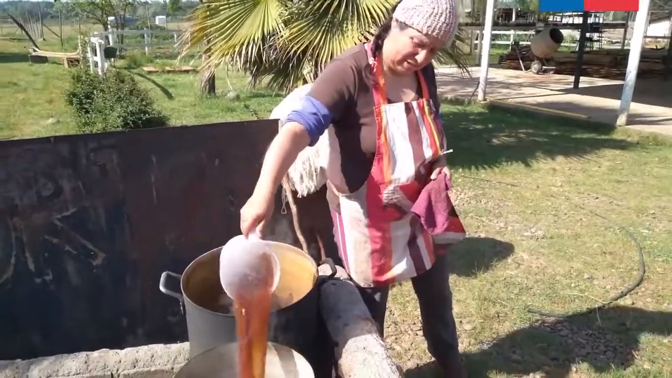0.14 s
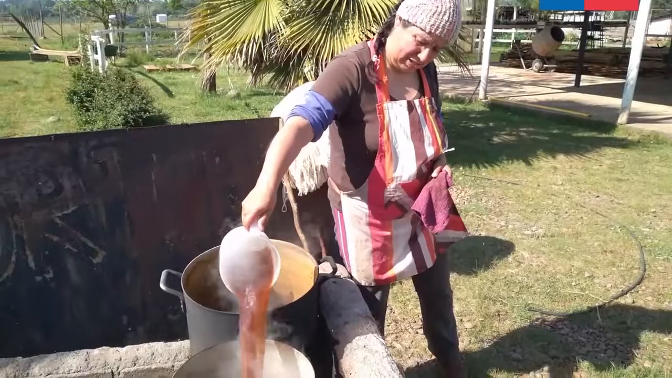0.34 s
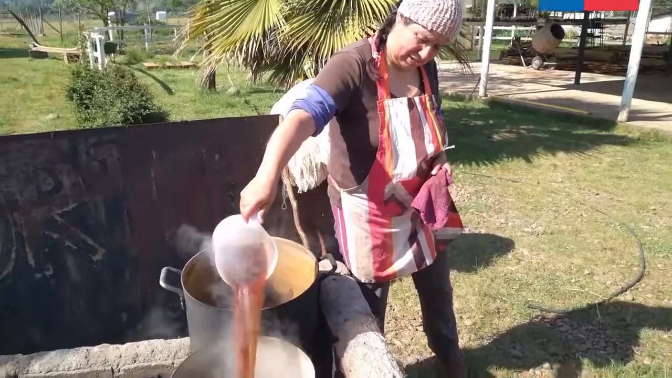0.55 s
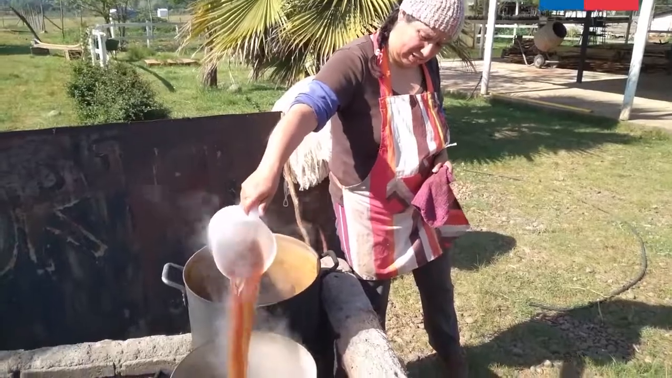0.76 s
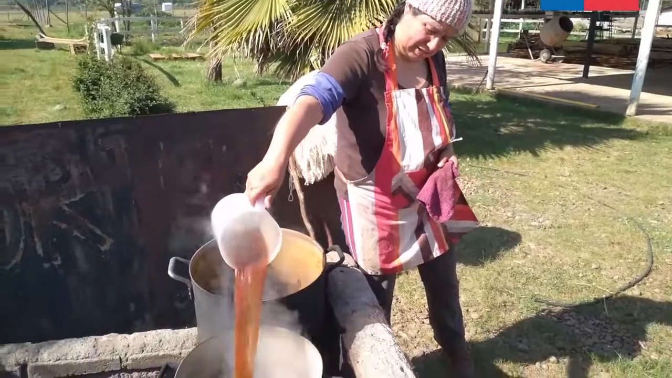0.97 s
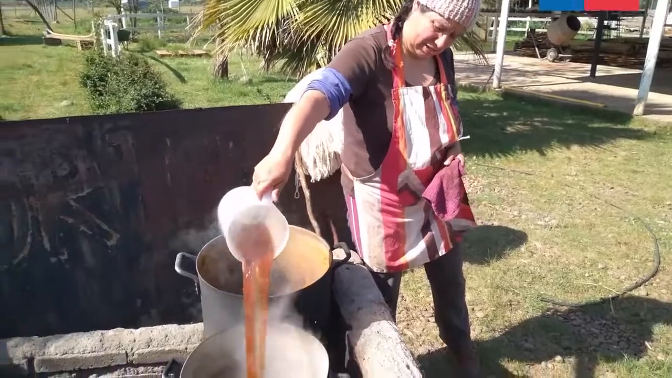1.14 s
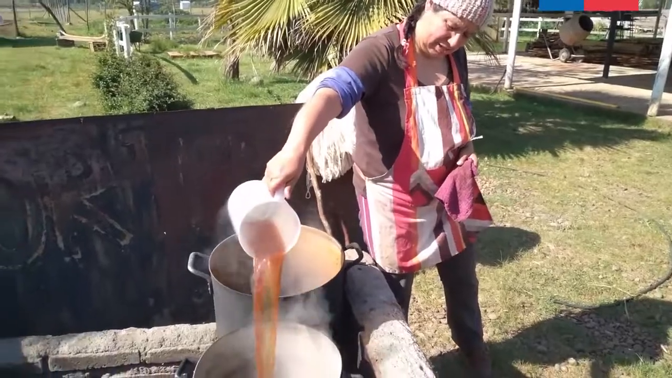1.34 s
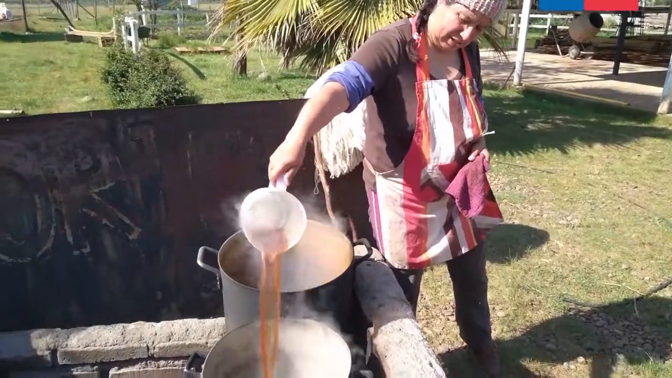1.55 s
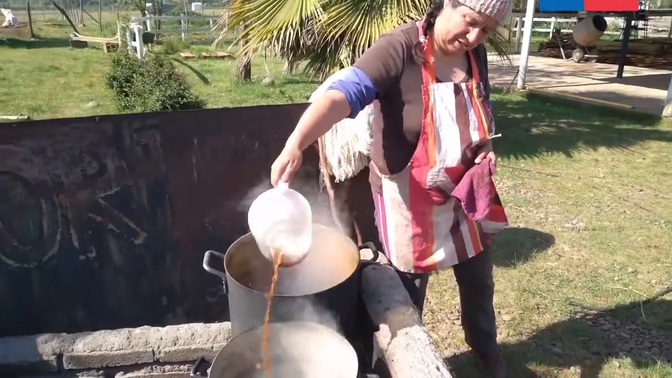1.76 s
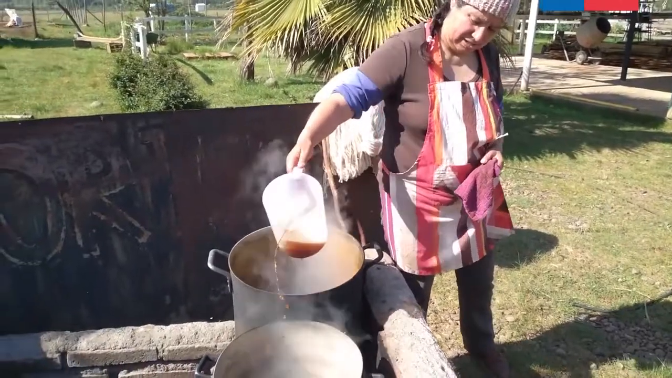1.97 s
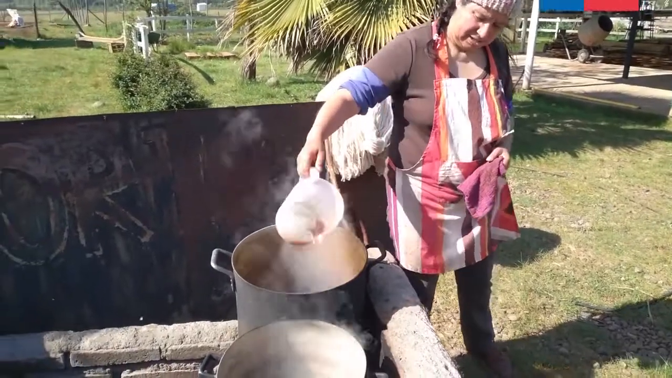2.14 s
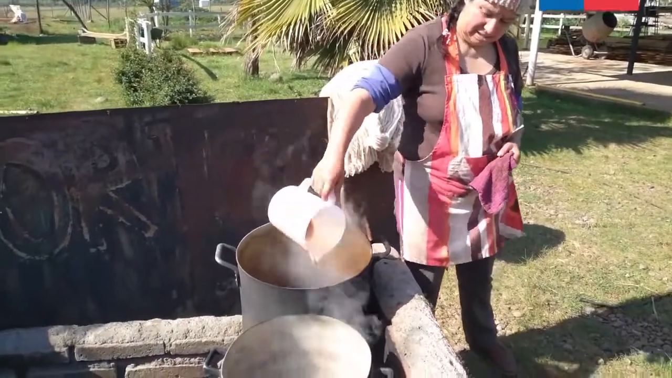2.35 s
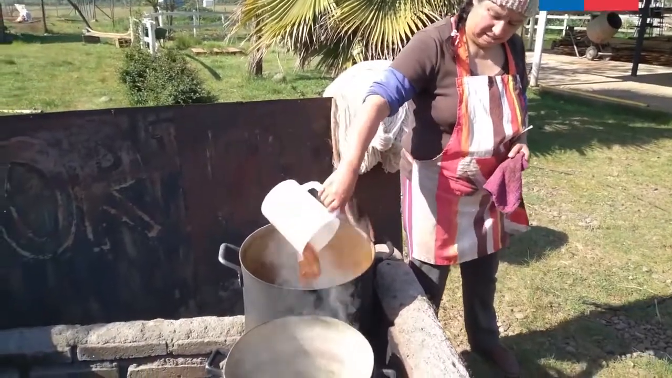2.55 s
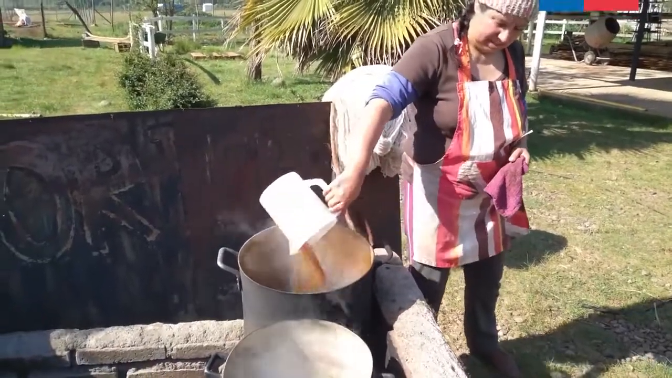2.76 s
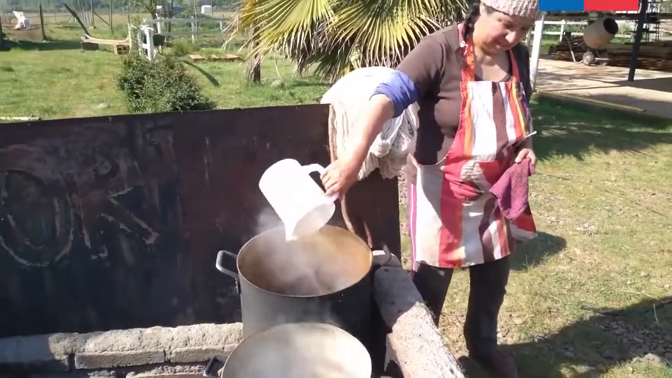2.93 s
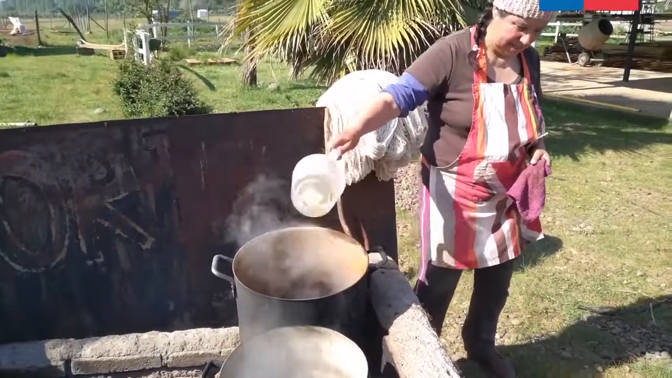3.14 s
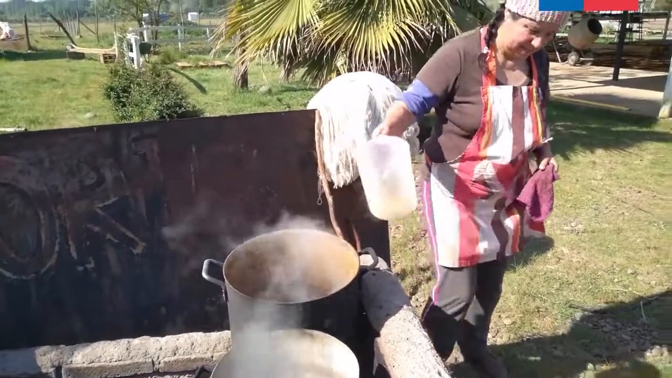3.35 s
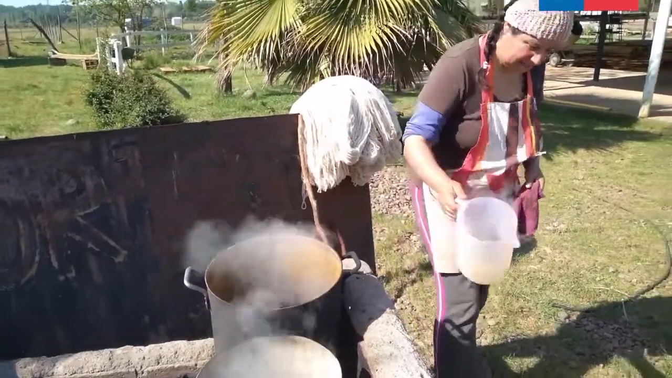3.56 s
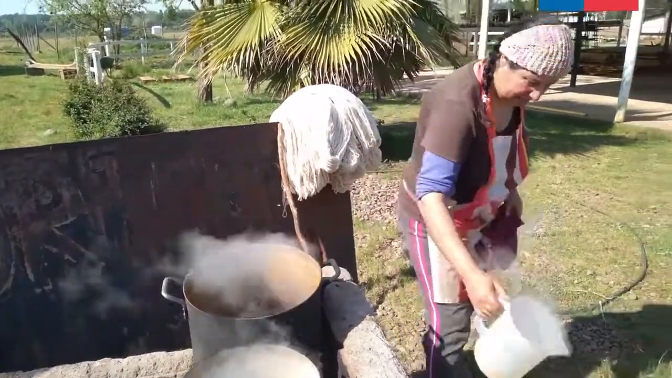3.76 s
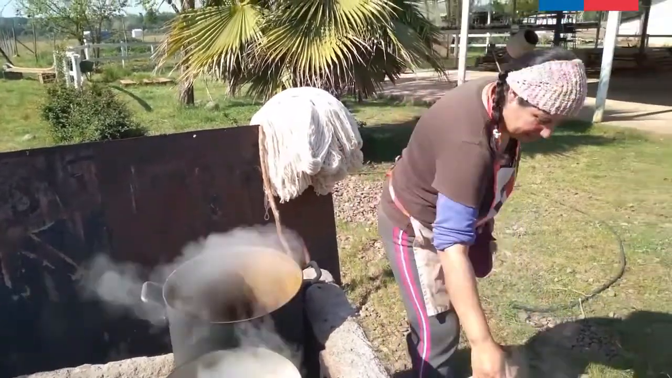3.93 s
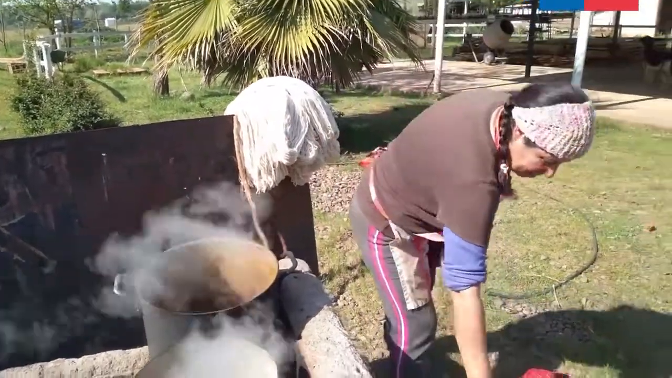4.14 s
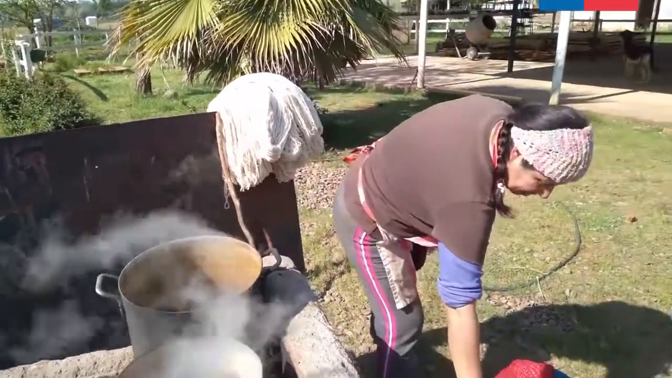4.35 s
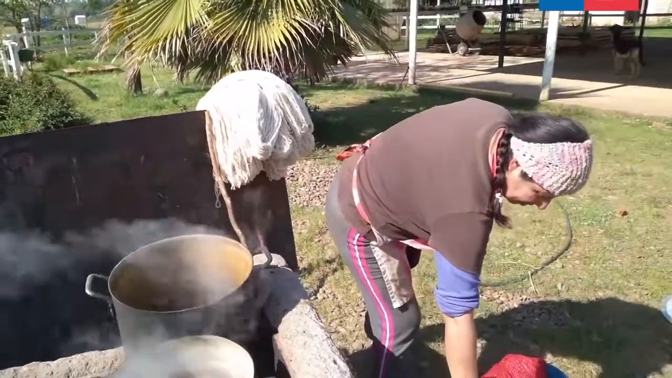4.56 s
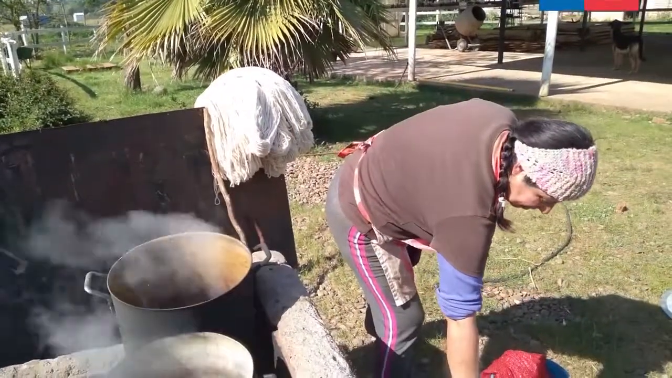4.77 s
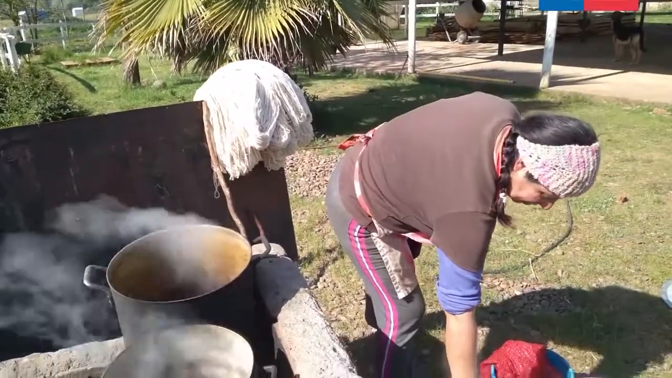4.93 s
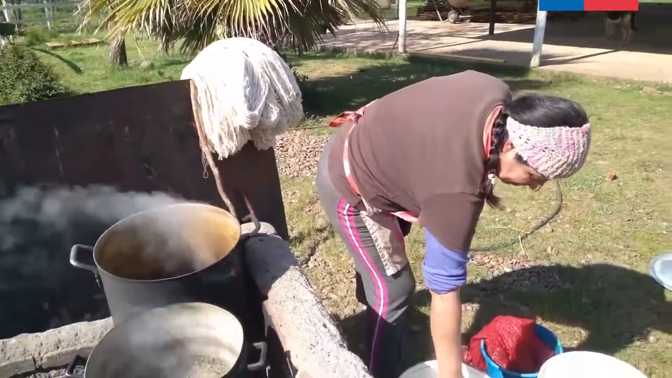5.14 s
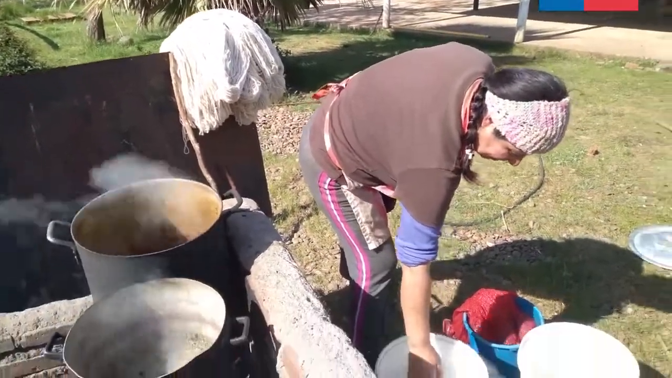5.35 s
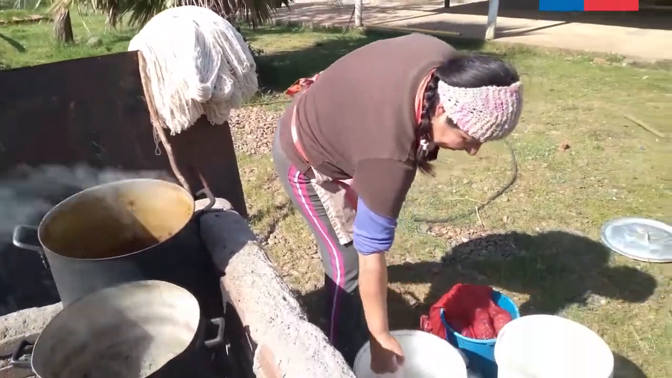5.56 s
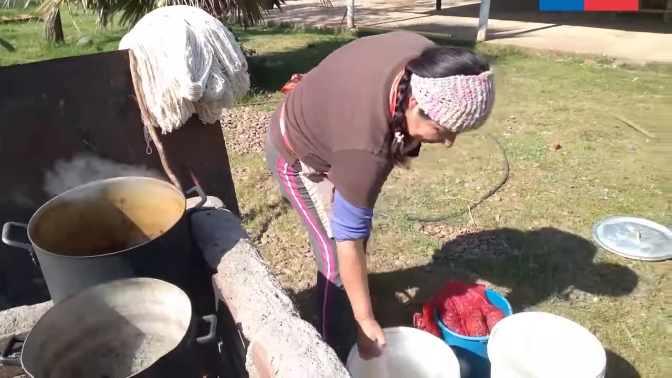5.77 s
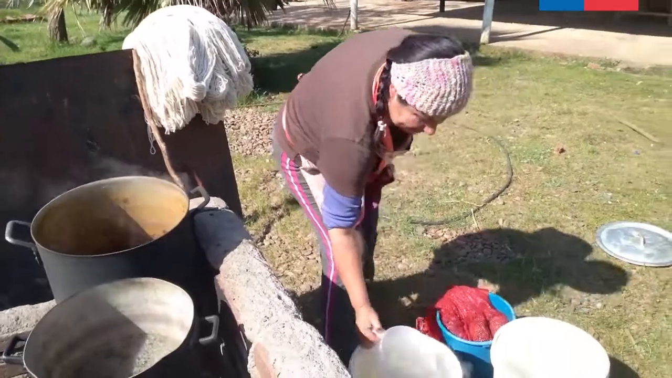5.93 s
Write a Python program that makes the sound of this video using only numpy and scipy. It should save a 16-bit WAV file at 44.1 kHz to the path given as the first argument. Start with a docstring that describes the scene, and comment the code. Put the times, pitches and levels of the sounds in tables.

```python
"""A long splashing pour and then thrown dregs are heard in a big metal pot, amid wind thumps and a motor hum.
The pour layers ringing bubbles, impact noise and spray, shaped by the pot as the stream lands deeper.
The plastic jug is then knocked, dragged and dipped in a bucket: noise bursts, decaying modes and stick-slip clicks.
Wind is low noise with single slow pulses; the motor is a wavering sine over a faint hiss of open air."""
import sys
import numpy as np
from scipy import signal
from scipy.io import wavfile
from scipy.ndimage import uniform_filter1d, map_coordinates

SR = 44100
rng = np.random.default_rng(int(sys.argv[2]) if len(sys.argv) > 2 else 0)


def waveform_to_disk(signal):
    """Save audio, clipped to [-1, 1], as 16-bit WAV at the path in sys.argv[1]."""
    frames = np.transpose(np.atleast_2d(signal))
    scaled = np.clip(frames, -1, 1) * 32767
    samples = np.round(scaled).astype(np.int16)
    wavfile.write(sys.argv[1], SR, samples)


N = 264600
TIME = np.arange(N) / SR

# the long pour and the dregs, before the trims of each layer:
# (time [s], gurgle level [dB], splash level [dB], spray level [dB])
POUR_CURVES = [
    [(0.0, -22, -33, -28), (0.012, -20.5, -31, -20), (0.024, -23, -30.5, -24), (0.055, -28, -20.5, -25.5),
     (0.078, -22, -28, -32), (0.094, -21, -27, -15), (0.106, -27, -32, -44), (0.122, -29, -31, -41),
     (0.135, -20.5, -23.5, -29), (0.162, -21, -24, -25.5), (0.18, -31, -30, -29),
     (0.205, -29.5, -23, -25.5), (0.255, -22, -26.5, -20.5), (0.272, -32, -25, -28.5),
     (0.3, -26, -24.5, -25), (0.41, -28.5, -23, -30), (0.44, -31.5, -31, -30), (0.6, -33.5, -34.5, -45),
     (0.73, -30, -30.5, -32), (0.86, -33.5, -39.5, -36), (0.925, -34.5, -37, -45), (0.97, -34.5, -39, -41),
     (1.04, -33.5, -43, -54), (1.13, -33.5, -46, -71), (1.2, -33, -43, -30.5), (1.29, -32.5, -37.5, -39),
     (1.4, -36.5, -44, -37), (1.51, -37, -37.5, -36.5), (1.66, -36.5, -37, -33.5),
     (1.8, -31.5, -34.5, -28.5), (1.91, -30, -31.5, -29), (1.97, -37.5, -40.5, -45),
     (2.13, -44.5, -50, -51), (2.27, -51.5, -70, -57), (2.3, -59, -74, -77)],
    [(2.7, -73, -78, -99), (2.718, -53, -87, -31), (2.772, -80, -44.5, -46), (2.793, -53, -37, -37),
     (2.804, -35, -22, -24), (2.826, -29.5, -28.5, -29), (2.84, -30, -31, -29), (2.876, -24, -23.5, -33),
     (2.9, -33, -27.5, -31), (2.938, -31, -26, -27), (2.968, -41, -26, -28), (2.992, -28, -31.5, -28.5),
     (3.012, -31, -32, -36), (3.034, -33, -27.5, -30), (3.068, -38, -37, -35.5), (3.085, -43, -38, -50),
     (3.11, -46, -50.5, -40), (3.17, -58, -60, -63)],
]
# colour of splashing near the surface: (frequency [Hz], density [dB per Hz])
SPLASH_COLOUR = [(710, -10), (1200, -15), (1450, -10.5), (1710, 0.5), (1920, -5), (2320, -2.5),
                 (2690, -3.5), (3720, -2), (4200, -6.5), (4900, -4), (6000, -5.5), (7800, -18),
                 (13200, -120)]
# colour of splashing deep in the pot: (frequency [Hz], density [dB per Hz])
DEEP_SPLASH_COLOUR = [(710, -47.5), (1200, -31.5), (1320, -14.5), (1460, 4.5), (1730, -3.5), (2020, 1.5),
                      (2210, -3), (2600, -6.5), (3270, -8), (3900, -7.5), (4280, -7.5), (4650, -1.5),
                      (5070, -3), (5610, -25), (6000, -32), (7800, -37), (13200, -120)]
# colour of spray and of the bright ticks on knocks: (frequency [Hz], density [dB per Hz])
SPRAY_COLOUR = [(3120, -24.5), (5300, -19), (5840, -12.5), (8410, 4.5), (8980, 5), (10500, -5.5),
                (15100, -9), (16000, -46)]
POURING, HANDLING = (0, 3.2), (3.1, 6)  # when bubbles form: (from [s], to [s])


def gain_of(db):
    """Decibels to amplitude."""
    return 10 ** (np.asarray(db) / 20)


def evened(x):
    """Scales to rms 1."""
    return x / np.sqrt(np.mean(x ** 2) + 1e-20)


def peaked(x, db):
    """Scales to a peak level."""
    return gain_of(db) * x / (abs(x).max() + 1e-12)


def steadied(x, size=2600):
    """Holds the slow level near rms 1 and keeps the fast grain."""
    power = uniform_filter1d(uniform_filter1d(x ** 2, size), size)
    floor = np.mean(x ** 2) / 1000  # keeps silence from being blown up
    return x / np.sqrt(abs(power) + floor)


def add(mix, s, sound):
    """Mixes a sound in at time s, or at the start if s is negative."""
    part = mix[max(round(s * SR), 0):][:len(sound)]
    part += sound[:len(part)]


def level(tables, axis):
    """Gain over time from one dB column of several curves; silent between them."""
    gain = np.zeros(N)
    for rows in map(np.array, tables):
        gain += gain_of(np.interp(TIME, rows[:, 0], rows[:, axis], left=-140, right=-140))
    return uniform_filter1d(gain, size=200)


def swells(rows, axis, rise_s, fall_s):
    """Gain over time of strokes that each swell to a height and fade, summed as power."""
    power = np.zeros(N)
    for row in rows:
        away = TIME - row[0]
        power += (gain_of(row[axis]) * np.exp(np.minimum(away / rise_s, -away / fall_s))) ** 2
    return np.sqrt(power)


def read(points, hz):
    """Reads a spectrum table on a log-frequency axis."""
    f, value = np.transpose(points)
    return np.interp(np.log(hz + 1), np.log(f + 1), value)


def colour(x, points, size=4096):
    """Causal minimum-phase filter with the given spectrum."""
    db = np.maximum(read(points, abs(np.fft.fftfreq(size, 1 / SR))), -100)
    spectrum = np.exp(np.conj(signal.hilbert(np.log(gain_of(db)))))
    taps = np.fft.ifft(spectrum).real
    return signal.fftconvolve(x, taps[:size // 2])[:len(x)]


def band(x, low_hz, high_hz, order=3):
    """Band-pass, with its lower edge held to at most a quarter of the sample rate."""
    low_hz = np.clip(low_hz, 20, SR / 4)
    high_hz = np.clip(high_hz, low_hz + 20, SR / 2 - 20)
    return signal.sosfilt(signal.butter(order, [low_hz, high_hz], "band", fs=SR, output="sos"), x)


def resonate(x, hz, width):
    """A resonance of gain 1 that follows the curve hz: shift it to zero, smooth, shift back."""
    turn = np.exp(2j * np.pi * np.cumsum(hz) / SR)
    r = np.exp(-np.pi * width / SR)
    return 2 * (turn * signal.lfilter([(1 - r) ** 2], [1, -2 * r, r * r], x / turn + 1e-18)).real


def clicks(per_s, spread_db):
    """Random impacts, most small and a few large."""
    chance, size, sign = rng.random(N), rng.exponential(1, N), rng.choice([-1, 1], N)
    return (chance < per_s / SR) * sign * gain_of(spread_db * np.minimum(size, 4))


def burst(t, decay, rise):
    """A puff of noise that swells quickly and dies away."""
    return rng.standard_normal(len(t)) * np.exp(-t / decay) * (1 - np.exp(-t / rise)) ** 2


def bubbles(span, low_hz, high_hz, per_s, cycles, rise, spread_db):
    """Bubbles of many sizes; each rings for some cycles and rises in pitch as it nears the surface."""
    births = clicks(per_s, spread_db)
    pitch = low_hz * (high_hz / low_hz) ** rng.random(N)
    out = np.zeros(N)
    for i in np.flatnonzero(births * (TIME > span[0]) * (TIME < span[1])):
        turns = TIME[:int(5 * cycles / pitch[i] * SR)] * pitch[i]
        swell = np.exp(-turns / cycles) * (1 - np.exp(-turns))
        ring = np.sin(2 * np.pi * turns * (1 + rise * turns / cycles)) * swell
        add(out, TIME[i], births[i] * pitch[i] * ring)
    return evened(out) * np.sqrt((span[1] - span[0]) / TIME[-1])  # about rms 1 inside the span


def echoed(x, wet_db):
    """Reflections from the pot wall and the iron windbreak, each band dying at its own speed."""
    # how long reflections last: (frequency [Hz], time to fall 60 dB [s])
    echo_times = [(200, 0.28), (500, 0.37), (1500, 0.19), (3000, 0.24), (8000, 0.28), (16000, 0.33)]
    n = SR // 2
    taps = rng.choice([-1., 1.], n) * (rng.random(n) < 3000 / SR) * (np.arange(n) > SR * .002)
    hz, t, z = signal.stft(taps, SR, nperseg=256)
    fade = gain_of(-60 * t / read(echo_times, hz)[:, None])
    tail = signal.istft(z * fade, SR, nperseg=256)[1]
    return x + gain_of(wet_db) * signal.fftconvolve(x, tail / np.linalg.norm(tail))[:N]


def background():
    """A wavering motor hum and a steady whine over the faint hiss of open air."""
    # loudness of the distant motor: (time [s], level [dB])
    motor_curve = [(0, -40), (2.7, -40), (3.1, -32.5), (4.5, -30), (5.5, -34), (6, -25)]
    # colour of the open air: (frequency [Hz], density [dB per Hz])
    air_colour = [(88, -9.5), (150, -10), (190, -10), (240, -51), (291, -26), (383, -60.5), (448, -20.5),
                  (649, -32), (1170, -25), (2140, -33), (3160, -27.5), (5680, -32.5), (8560, -26),
                  (15100, -43), (16000, -55)]
    motor_hz, whine_hz, whine_db, air_db = 81.6, 183, -52.5, -55.5
    s, db = np.transpose(motor_curve)
    waver = evened(np.interp(TIME, np.linspace(0, TIME[-1], 60), rng.standard_normal(60)))
    turns = np.cumsum(motor_hz * (1 + 0.0075 * waver)) / SR
    hum = evened(np.sin(2 * np.pi * turns)) * gain_of(np.interp(TIME, s, db) + 0.29 * waver)
    whine = gain_of(whine_db) * evened(np.sin(2 * np.pi * whine_hz * TIME))
    air = gain_of(air_db) * evened(colour(rng.standard_normal(N), air_colour))
    return hum + whine + air


def wind():
    """A lumpy low rumble, and single eddies that briefly push and pull the microphone's diaphragm."""
    # low wind between the eddies, raised 9 dB below: (time [s], level [dB])
    rumble_curve = [(0, -28.5), (.2, -49.5), (.6, -43.5), (.75, -35.5), (1.9, -41.5), (2.05, -50.5),
                    (2.27, -57.5), (2.4, -34), (2.55, -49), (2.85, -39), (3.45, -46), (4.2, -45),
                    (5.25, -44), (5.82, -30), (6, -47.5)]
    # colour of the rumble: (frequency [Hz], density [dB per Hz])
    rumble_colour = [(20, -5), (38, -24), (60, 3.5), (100, -1), (150, -6.5), (220, -22.5), (400, -34),
                     (800, -57.5)]
    # strong eddies, raised 2 dB below: (time [s], level [dB], length scale [cycles])
    gusts = [(0.311, -13.5, 0.32), (0.683, -13, 0.43), (0.777, -9.5, 0.34), (0.889, -10, 0.44),
             (0.927, -14, 0.37), (0.98, -10.5, 0.44), (1.09, -6.5, 0.26), (1.142, -16.5, 0.29),
             (1.546, -5.5, 0.25), (1.573, -13, 0.49), (2.42, -15.5, 0.42), (2.624, -17, 0.26),
             (2.667, -17, 0.22), (2.81, -12, 0.16), (2.917, -6, 0.39), (4.113, -15, 0.37),
             (4.149, -10, 0.28), (4.33, -7.5, 0.34), (4.792, -10, 0.34), (4.819, -20, 0.6),
             (5.184, -4.5, 0.32), (5.496, -14, 0.57), (5.735, -12.5, 0.46), (5.801, -14, 1),
             (5.843, -12.5, 1)]
    lumps_db = 1.5  # how much the rumble comes and goes
    eddy_hz, eddy_hz_per_db = 143.6, 3.5  # pitch of a gust listed at 0 dB; weaker ones are slower
    lumps = gain_of(lumps_db * evened(uniform_filter1d(rng.standard_normal(N), size=2000)))
    rumble = steadied(lumps * colour(rng.standard_normal(N), rumble_colour), size=5000)
    out = gain_of(9.0) * level([rumble_curve], axis=1) * rumble
    t = np.arange(-SR // 32, SR // 32) / SR
    for s, db, cycles in gusts:
        hz = eddy_hz + eddy_hz_per_db * db
        swell = 1 / np.cosh(t * hz / cycles) * signal.windows.tukey(len(t), .5)
        push = np.cos(2 * np.pi * hz * t + 0.55 * rng.standard_normal())
        add(out, s + t[0], -gain_of(db + 2.0) * swell * push)
    return band(out, low_hz=28.93, high_hz=1990, order=2)


def whistles():
    """Weak, breathy tones of narrow noise that fade in, flutter and fade out."""
    # broken whistles and far tones: (start [s], length [s], level [dB], frequency [Hz], width [Hz])
    whistle_tones = [(2.282, 0.054, -61, 2020, 129), (2.325, 0.043, -58, 1850, 150),
                     (2.719, 0.041, -54, 2040, 90), (2.72, 0.079, -56, 990, 90),
                     (3.07, 0.12, -53, 2350, 120), (3.137, 0.077, -53, 930, 90),
                     (3.189, 0.041, -52.5, 3210, 130), (3.227, .36, -55, 2513, 60),
                     (3.305, 0.1, -54, 4330, 500), (3.42, 0.066, -67, 3650, 300),
                     (3.479, 0.13, -60, 4380, 424), (3.578, .16, -57, 2450, 70),
                     (3.634, 0.027, -58, 1500, 201), (3.894, .09, -61, 2005, 70),
                     (4.415, 0.07, -50.5, 500, 111), (4.52, 0.3, -53.5, 494, 78),
                     (4.555, 0.27, -61.5, 970, 160), (4.96, 0.062, -59, 1210, 70),
                     (5.184, 0.06, -50, 1137, 100), (5.294, 0.034, -57, 2530, 140),
                     (5.575, 0.08, -62, 5230, 200)]
    edge_s, flutter_db = 0.0062, -2  # soft ends, and how much each one breaks up
    out = np.zeros(N)
    for s, length, db, hz, width in whistle_tones:
        t = TIME[:int(length * SR)]
        tone = band(rng.standard_normal(SR), hz - width / 2, hz + width / 2, order=2)[-len(t):]
        flutter = gain_of(flutter_db * evened(uniform_filter1d(rng.standard_normal(SR), size=500)))[:len(t)]
        edges = np.minimum(np.minimum(t, length - t) / edge_s, 1)
        add(out, s, gain_of(db) * evened(tone * flutter * edges))
    return echoed(out, wet_db=-6)


def simmer():
    """A faint, dense patter of small bubbles in the hot liquid as the pouring ends and after."""
    seethe = bubbles(HANDLING, 422, 1900, per_s=320, cycles=17, rise=0.0031, spread_db=3.5)
    return gain_of(-68.5) * echoed(seethe, wet_db=-22)


def in_bucket(x):
    """What happens down in the bucket lingers in its resonances."""
    # resonances of the bucket: (frequency [Hz], width [Hz], level [dB])
    bucket_modes = [(483, 74, -5.5), (1023, 59, 11), (1390, 96, 13), (2595, 120, 3.5), (3200, 46, -10),
                    (3900, 160, -16), (5260, 180, 5), (5650, 260, 5), (6790, 140, 15)]
    at_bucket_s = 4  # only later sound excites the bucket
    inside = echoed(x * (TIME > at_bucket_s), wet_db=-6.5)
    ring = sum(gain_of(db) * band(inside, hz - width / 2, hz + width / 2, order=1)
               for hz, width, db in bucket_modes)
    return x + gain_of(-7.0) * ring


def pings():
    """Drips and clinks: short, slightly unsteady tones cut from narrow noise."""
    # drips and clinks: (time [s], peak level [dB], frequency [Hz], decay time [s])
    ping_tones = [(2.49, -43.5, 657, 0.0093), (2.72, -48, 3480, 0.0096), (2.754, -51, 3520, 0.016),
                  (2.758, -42, 3080, 0.02), (3.278, -6.5, 8270, 0.0018), (3.312, -41, 3190, 0.016),
                  (3.382, -43.5, 1344, 0.032), (3.452, -44, 3610, 0.01), (3.65, -42, 2517, 0.014),
                  (4.087, -26.5, 458.6, 0.017), (4.428, -47.5, 2400, 0.0064), (4.428, -50, 1790, 0.014),
                  (4.452, -45, 1820, 0.016), (5.019, -43, 5630, .04), (5.045, -42.5, 3810, .035),
                  (5.049, -24.5, 8060, 0.0044), (5.551, -44.5, 1383, 0.025), (5.571, -44, 976, 0.025),
                  (5.571, -51, 2610, 0.01), (5.572, -50, 1995, 0.008), (5.703, -53, 2740, 0.03),
                  (5.7, -47, 5540, .025), (5.698, -33.5, 8550, 0.033), (5.76, -33, 8460, 0.02),
                  (5.762, -41.5, 1043, 0.057)]
    out, t = np.zeros(N), np.arange(SR // 2) / SR
    for s, db, hz, decay in ping_tones:
        width = 14 + 0.016 * hz  # [Hz]; higher tones are fuzzier
        tone = evened(band(rng.standard_normal(SR), hz - width / 2, hz + width / 2, order=2))[-len(t):]
        add(out, s, peaked(tone * np.exp(-t / decay) * (1 - np.exp(-t / 0.000844)), db))
    return echoed(out, wet_db=-6)


def blows():
    """The jug hits the basin and chatters against it; decaying modes of both ring briefly."""
    # hard blows as the jug is put down: (time [s], peak level [dB], share of the basin in the ring [0-1])
    hits = [(4.082, -19, 0.13), (4.106, -35, 0), (4.123, -38, 0.1), (4.138, -34, 0.15), (4.157, -42, 0.1),
            (4.327, -25.5, 1), (4.353, -38, 0.64), (4.375, -41, 0.84)]
    # ring of the empty jug: (frequency [Hz], level [dB], time to fall 60 dB [s])
    jug_modes = [(427, -13, 0.093), (685, -16, 0.38), (1230, -1, 0.081), (1615, 1.5, 0.091),
                 (2390, 0, 0.061), (2710, -8, 0.13), (3400, -3, 0.063), (3680, -22, 0.2)]
    # ring of the basin: (frequency [Hz], level [dB], time to fall 60 dB [s])
    basin_modes = [(608, -1, .16), (1072, 5.5, 0.12), (1760, 6.5, 0.056), (2050, -6, 0.11),
                   (2590, -16, 0.13), (3000, -13, 0.21), (3460, -5.5, 0.11), (3740, -19, 0.22)]
    spread_db, detune_share = 3, 0.004  # each contact lands on another spot
    out, t = np.zeros(N), TIME[:SR // 3]
    for s, peak_db, basin in hits:
        ring = np.zeros(len(t))
        for modes, share in [(jug_modes, 1 - basin), (basin_modes, basin)]:
            spots = rng.standard_normal((len(modes), 2))
            for (hz, db, t60), (spot, detune) in zip(modes, spots):
                decay = np.exp(-np.log(1000) * t / t60) * np.sign(spot)
                tone = np.sin(2 * np.pi * hz * (1 + detune_share * detune) * t)
                ring += share * gain_of(db + spread_db * spot) * decay * tone
        add(out, s, peaked(ring, peak_db))
    return echoed(out, wet_db=-9)


def knocks():
    """Dull blows of banded noise with a bright tick on top and a short buzzing aftersound."""
    # knocks of the jug and hollow slaps of liquid, scaled together below:
    # (time [s], level [dB], lowest frequency [Hz], highest frequency [Hz], bright tick level [dB])
    knock_list = [(0.066, -12, 1050, 1990, -40), (0.0866, -14.5, 1120, 1760, -45),
                  (0.207, -14.5, 1430, 1870, -45), (0.2425, -15.5, 1820, 2640, -45),
                  (0.282, -16, 1150, 1680, -45), (0.332, -9, 1300, 1970, -45),
                  (0.589, -12, 1260, 2270, -45), (0.633, -12, 1450, 3740, -50),
                  (0.681, -20.5, 1350, 2430, -50), (0.893, -21.5, 1480, 2270, -50),
                  (1.0926, -28.5, 1440, 2200, -65), (1.161, -27, 1370, 3930, -45),
                  (1.29, -26, 1450, 2099, -55), (1.437, -20.5, 3500, 4300, -45),
                  (1.488, -30, 3770, 4050, -50), (1.503, -30, 3760, 4200, -45),
                  (2.526, -12, 1540, 3450, -19), (2.778, -15.5, 1280, 2260, -40),
                  (2.804, -9, 1900, 2680, -26), (2.821, -8, 930, 2430, -11),
                  (2.906, -13.5, 1810, 2280, -36), (2.922, -23, 920, 1600, -40),
                  (3.031, -24, 920, 1350, -51), (3.183, -25.5, 296, 1430, -44),
                  (3.205, -32, 450, 1390, -58), (3.335, -33, 520, 1100, -60), (3.278, -17, 600, 1170, -28),
                  (4.081, -16, 890, 3470, -25), (4.082, -26, 5000, 7700, -43),
                  (4.083, -18.5, 218, 495, -58), (4.108, -27.5, 250, 1300, -54),
                  (4.135, -28.5, 900, 2680, -48), (4.324, -23.5, 2560, 3640, -17.5),
                  (4.325, -27, 5530, 13500, -42), (4.329, -23, 230, 600, -54),
                  (4.361, -45, 2380, 3740, -52), (4.518, -43, 940, 1130, -71),
                  (4.997, -38, 1540, 1900, -70), (5.042, -23.5, 1230, 1750, -31),
                  (5.042, -23, 4400, 6150, -50), (5.074, -28, 1370, 1820, -55),
                  (5.072, -32, 4200, 7000, -40), (5.088, -21.5, 2710, 3120, -55),
                  (5.117, -27.5, 1290, 1800, -51), (5.142, -32, 1380, 1710, -58),
                  (5.243, -24.5, 1480, 1940, -51), (5.255, -30.5, 2450, 2665, -62),
                  (5.269, -27, 1610, 2030, -59), (5.273, -41, 2360, 2650, -62),
                  (5.34, -44, 1900, 2800, -65), (5.308, -38.5, 5300, 6300, -50),
                  (5.399, -57, 1980, 5000, -29.5), (5.474, -33, 840, 1530, -58),
                  (5.465, -25.5, 172, 327, -69), (5.572, -22, 278, 550, -60), (5.63, -29, 3640, 4540, -52),
                  (5.682, -39.5, 850, 1070, -50), (5.696, -32, 2600, 3120, -40),
                  (5.763, -35, 277, 800, -46), (5.824, -23.5, 300, 690, -60),
                  (5.789, -20.5, 1870, 2610, -25.5), (5.798, -35, 330, 750, -60),
                  (5.858, -26, 350, 900, -60), (5.823, -20.5, 1900, 3180, -18.5),
                  (5.872, -18, 850, 2160, -49), (5.89, -25, 400, 1390, -52),
                  (5.903, -19.5, 2290, 5800, -20), (5.964, -39, 6550, 7440, -17.5),
                  (5.99, -30, 3850, 4150, -32)]
    decay_s, tail_share, tail_s = 0.0055, 0.17, 0.026  # the vessel goes on buzzing after a blow
    out, t = np.zeros(N), np.arange(SR // 4) / SR
    for s, db, low_hz, high_hz, tick_db in knock_list:
        thump = burst(t, decay_s, rise=0.001) + tail_share * burst(t, tail_s, rise=0.003)
        blow = band(thump, low_hz, high_hz, order=4)
        tick = colour(burst(t, decay_s * 0.87, rise=0.0011), SPRAY_COLOUR)
        add(out, s - .001, peaked(blow, db) + peaked(tick, tick_db))
    return in_bucket(echoed(0.63 * out, wet_db=-8))


def rubs():
    """Liquid slops in the carried jug; the jug stutters along the bucket and dips in."""
    # strokes of carrying, dragging and dipping: (time of the height [s], hollow body level [dB], rasp level [dB])
    rub_strokes = [
        [(3.2, -34, -39.5), (3.29, -46, -37), (3.36, -56, -41), (2.9, -36.5, -54), (3.43, -41.5, -43.5),
         (3.6, -38, -39.5), (3.72, -35, -63), (4.2, -40, -42)],
        [(4.99, -65, -62), (5.06, -30, -39.5), (5.125, -22.5, -29.5), (5.21, -27, -41), (5.27, -39, -39),
         (5.33, -57, -50)],
        [(5.49, -71, -69), (5.56, -36.5, -60), (5.69, -58, -54), (5.8, -29, -44), (5.89, -41, -28.5),
         (5.97, -37, -42)],
    ]
    # how a stroke of each kind swells and fades: (rise time [s], fall time [s])
    stroke_times = [(0.031, 0.0477), (0.034, 0.024), (0.049, 0.086)]
    # colour of carrying: (frequency [Hz], density [dB per Hz])
    carry_colour = [(120, -17), (200, 6), (400, 11.5), (620, 2.5), (760, -15), (900, -0.5), (1130, -35.5),
                    (1350, -17.5), (1700, -44), (2200, -46.5), (4840, -100)]
    # colour of dipping: (frequency [Hz], density [dB per Hz])
    dip_colour = [(120, -26), (200, 24), (440, 15.5), (708, -13), (1030, -6.5), (1360, -10.5), (1600, -21),
                  (2000, -11), (2550, -18.5), (3100, -15), (3470, -39), (3950, -9.5), (4400, -36),
                  (5170, -19), (7150, -40), (8400, -10), (9550, -42), (15000, -31)]
    # resonances of the dragged jug, widened by 15 % below:
    # (frequency [Hz], width [Hz], level [dB], pitch rise [octaves per s])
    drag_modes = [(407, 62, -5.5, 0.73), (469, 52, -1, 0.9), (568, 35, -6.5, 0.24), (1230, 230, -28, -0.8),
                  (1476, 45, -12, 0.19), (1818, 48, -13.5, -0.016), (3060, 330, -35, 0.18),
                  (4440, 180, -36, 0), (5430, 690, -45, 0), (8350, 570, -41, 0.11)]
    drag_middle_s, drag_half_s = 5.12, 0.2  # the pitches glide only during the drag
    slips = clicks(650, 6.7)
    travel = np.clip(TIME - drag_middle_s, -drag_half_s, drag_half_s)
    drag = sum(gain_of(db) * resonate(slips, hz * 2 ** (rise * travel), 1.15 * width)
               for hz, width, db, rise in drag_modes)
    slop = bubbles(HANDLING, 271.6, 1840, per_s=650, cycles=5.7, rise=0.01, spread_db=2.0)
    dip = evened(clicks(1100, 4.2))
    dip += 0.5 * bubbles(HANDLING, 279.2, 5160, per_s=1100, cycles=9.8, rise=0.014, spread_db=2.5)
    sounds = [colour(slop, carry_colour), drag, in_bucket(colour(dip, dip_colour))]
    out = np.zeros(N)
    for rows, x, (rise_s, fall_s) in zip(rub_strokes, sounds, stroke_times):
        x = echoed(x, wet_db=-7.0)
        body = steadied(band(x, 121.4, 452, order=4), size=1600)
        rasp = steadied(band(x, 530, 17000, order=5), size=1600)
        out += swells(rows, 1, rise_s, fall_s) * body + swells(rows, 2, rise_s, fall_s) * rasp
    return out


def glugs():
    """A big bubble rings as one damped tone that creeps upward."""
    # single big bubbles: (time [s], peak level [dB], frequency [Hz])
    glug_tones = [(0.082, -27.5, 405), (0.086, -23.5, 590), (0.127, -24, 367), (.134, -21, 615),
                  (0.143, -14.5, 327), (.149, -30, 715), (.16, -29, 800), (0.231, -17.5, 361),
                  (0.251, -16, 343), (.252, -26.5, 736), (.256, -24.5, 920), (0.365, -23, 378),
                  (0.41, -21.5, 298), (.46, -19, 323), (1.016, -20.5, 331), (1.05, -33.5, 355),
                  (1.109, -25, 350), (1.17, -22, 354), (1.2, -22.5, 335), (1.304, -20.5, 346),
                  (1.33, -21.5, 346), (1.509, -24.5, 365), (1.816, -21.5, 298), (1.822, -32, 695),
                  (1.936, -24, 446), (2.133, -30.5, 450), (2.146, -32.5, 480), (2.16, -28.5, 470),
                  (2.02, -36, 855), (2.054, -37.5, 840), (2.227, -31.5, 413), (2.34, -33.5, 374),
                  (2.548, -34, 353), (2.817, -21.5, 960), (2.853, -22, 1010), (2.872, -19, 250),
                  (2.907, -25.5, 945), (2.941, -22, 288), (3.034, -20, 221.5), (3.252, -28, 560),
                  (3.613, -26.5, 180), (3.712, -25.5, 285), (3.751, -28.5, 209), (3.795, -25, 373),
                  (4.961, -19.5, 363), (5.066, -28, 496), (5.088, -16.5, 434), (5.103, -15.5, 392),
                  (5.119, -10, 413), (5.14, -20, 543), (5.197, -25, 470), (5.768, -24.5, 446),
                  (5.886, -35, 475)]
    cycles, rise = 2.48, 0.0052  # cycles per decay time, in which the pitch rises by twice this share
    out = np.zeros(N)
    for s, db, hz in glug_tones:
        decay = cycles / hz
        t = np.arange(int(6 * decay * SR)) / SR
        tone = np.sin(2 * np.pi * hz * t * (1 + rise * t / decay))
        add(out, s, peaked(tone * np.exp(-t / decay) * (1 - np.exp(-t * hz)), db))
    return echoed(out, wet_db=-6.0)


def depth():
    """How deep the stream lands at each moment, 0-1."""
    # landing depth: (time [s], share of the sound that passes the pot's resonances [0-1])
    depth_curve = [(0, 0.2), (.42, 0.25), (.6, 0.51), (1.1, 1), (1.7, 0.85), (2.1, 1), (2.75, 0.059),
                   (3.1, 0.31)]
    return np.interp(TIME, *np.transpose(depth_curve))


def potted(x):
    """The deeper the stream lands, the more of it is heard through the resonances of the air in the pot."""
    # resonances of the air inside the pot: (frequency [Hz], width [Hz], level [dB])
    pot_modes = [(910, 28, 12), (1508, 145, -0.5), (1628, 16, -38.5), (1900, 68, -4.5), (2038, 54, 2),
                 (2546, 66, 5), (2645, 120, -1.5), (3060, 260, 3), (3810, 490, 8), (4730, 80, -12.5),
                 (5240, 44, -16), (6515, 360, 11.5), (7080, 470, -8.5), (7040, 350, -7.5), (8180, 820, 3),
                 (9230, 1100, -6), (10820, 230, -4.5), (12300, 300, 2)]
    ring = sum(gain_of(db) * band(x, hz - width / 2, hz + width / 2, order=1) for hz, width, db in pot_modes)
    return (1 - depth()) * x + depth() * ring


def off_the_wall(x, delay, share, count=32):
    """One bounce off the pot wall; its delay wanders with the landing point, so the colour shifts."""
    wander = np.interp(TIME, np.linspace(0, TIME[-1], count), rng.uniform(-1.57, 1, count))
    bounce = map_coordinates(x, [(TIME - delay * (1 + 0.11 * wander)) * SR], order=3)
    return x + share * depth() * bounce


def drifting(x):
    """The pot's resonances open and close, sinking a little, as the stream wanders round the pot."""
    # drifting boosts and cuts: (time of the height [s], half length [s], frequency [Hz], boost [dB])
    hollows = [(0.64, 0.035, 3600, 11), (0.77, 0.11, 4800, 10.5), (0.81, 0.092, 3700, 7),
               (0.9, 0.081, 2280, 10), (0.98, 0.19, 2950, 13.5), (1.01, 0.16, 4650, 10),
               (1.06, 0.12, 3930, -40), (1.17, 0.034, 4130, 22.5), (1.32, 0.027, 3050, 21.5),
               (1.34, 0.085, 3980, -45.5), (1.33, 0.11, 2350, -13.5), (1.5, 0.034, 4400, 8.5),
               (1.63, 0.16, 3220, -44), (1.58, 0.03, 3300, -14), (1.56, 0.033, 5500, -12),
               (1.68, 0.1, 4300, 7), (1.72, 0.13, 2520, 9.5), (2.24, .08, 4560, 19), (.25, .25, 1530, 2.5),
               (.25, 0.61, 950, -7.5), (2.955, 0.29, 663, -19), (3.047, 0.22, 2370, 11),
               (3.02, 0.23, 2780, -9), (3.03, 0.16, 3340, 8.5)]
    half_width_hz, sag_per_s = 205, 0.09  # sag is the share by which each sinks in a second
    patchy_db = 4.2  # smaller random shifts of colour, strongest when the stream lands deep
    hz, t, z = signal.stft(x, SR, nperseg=1024, noverlap=768)
    patches = uniform_filter1d(rng.standard_normal(z.shape), size=4, axis=0)
    patches = evened(uniform_filter1d(patches, size=12, axis=1))
    boost_db = np.interp(t, TIME, depth()) * (patchy_db * patches - 1.66)
    for s, length, centre_hz, db in hollows:
        away = (hz[:, None] - centre_hz * (1 - sag_per_s * (t - s))) / half_width_hz
        boost_db += db * np.exp(-np.minimum(((t - s) / length) ** 2 + away ** 2, 30))
    return signal.istft(z * gain_of(boost_db), SR, nperseg=1024, noverlap=768)[1][:N]


def patter():
    """Fine droplets land in quick flurries; each is a tiny crack, and a few trap a bubble."""
    flurries = gain_of(5.3 * evened(uniform_filter1d(rng.standard_normal(N), size=220)))
    cracks = evened(band(clicks(900, 5.3), 1400, 5600, order=2))
    trapped = bubbles(POURING, 1530, 5200, per_s=300, cycles=22, rise=0.003, spread_db=7)
    grains = steadied(flurries * cracks + 0.58 * trapped)
    deep_grains = evened(colour(potted(grains), DEEP_SPLASH_COLOUR))
    grains = (1 - depth()) * grains + depth() * deep_grains
    return gain_of(-6) * echoed(grains * level(POUR_CURVES, axis=2), wet_db=-13.5)


def splats():
    """Big drops burst with a sharp snap and a wetter body, amid a brief spatter of droplets and tiny bubbles."""
    # big drops bursting, scaled together below: (time [s], level [dB], size [0-1])
    drops = [(.0151, 4.5, 0.64), (0.0271, 1.5, 0.89), (0.0647, -3, 0.8), (0.0878, 1.5, 0.7),
             (0.0967, 1.5, 0.6), (0.1594, -9, 0.94), (0.219, -3, 0.7), (0.236, 0.5, 0.6),
             (0.3007, 4.5, 0.67), (0.329, -5.5, 0.85), (0.3368, 2, 0.79), (0.389, -6, 0.8),
             (0.422, -2, 0.7), (0.5557, -16, 0.88), (0.6751, -6, 0.05), (0.7481, -13, .15),
             (0.7848, -5.5, 0.1), (0.8789, -25, 1), (0.8906, -12, 0.81), (0.924, -20, 1),
             (0.9544, -8, 0.53), (1.164, -20.5, 1), (1.2072, -7, 0.04), (1.25, -8.5, 0), (1.4389, 1.5, 0.5),
             (1.506, -3, 0.59), (1.537, -18, 0.2), (1.584, 3.5, 0.08), (1.668, -7, 0.54),
             (1.739, -3.5, 0.3), (1.764, -9.5, 0.72), (1.7988, 4.5, 0.57), (1.8154, -11, 0),
             (1.826, -7, 0.79), (1.8742, 0, 0.76), (1.9122, -4.5, 0.8), (1.919, -14, 0.56),
             (1.942, -15, 0.8), (1.9866, -7.5, 0.98), (2.002, -12, 0.5), (2.0324, -0.5, 0.59),
             (2.052, -14, 0.86), (2.091, -10, 0.3), (2.1025, -5.5, 0.33), (2.121, 6, 0.03),
             (2.154, -7, 0.17), (2.205, -9, 0.52), (2.7216, -9, 0.2), (2.8042, -5, 0.8),
             (2.882, -14.5, 0.9), (2.923, -9, 1), (2.945, -11, 0.73), (2.992, -17, 1), (3.033, -28, 0.7),
             (3.083, -30, 0.9), (3.1134, -24, 0.76), (3.2785, 2.5, 0.4), (3.3, -6.5, 0.4)]
    # colour of a bursting drop: (frequency [Hz], density [dB per Hz])
    snap_colour = [(2500, -37), (5000, -19), (6500, -20), (7500, -2.5), (8200, -4), (8900, -2),
                   (10000, -10.5), (12000, -19.5), (14500, -19.5), (16000, -28)]
    small_s, big_s = 0.00031, 0.0033  # decay of the snap: a bigger drop takes longer to burst
    small_body_db, big_body_db = -40, 7.5  # and has more wet body under its snap, held to 0 dB
    spatter_share, spatter_rise_s, spatter_fall_s = 0.1, 0.0043, 0.013  # droplets around each burst
    froth_share, froth_rise_s, froth_fall_s = 0.048, 0.0083, 0.0073  # tiny bubbles beaten in by the biggest
    out, froth, t = np.zeros(N), np.zeros(N), np.arange(-SR // 50, SR // 20) / SR
    spatter = spatter_share * np.exp(np.minimum(t / spatter_rise_s, -t / spatter_fall_s))
    froth_swell = np.exp(np.minimum(t / froth_rise_s, -t / froth_fall_s))
    for s, drop_db, size in drops:
        decay = small_s * (big_s / small_s) ** size
        body_db = min(small_body_db + (big_body_db - small_body_db) * size, 0)
        body = (SPLASH_COLOUR, drop_db + body_db - 1, decay * 2.05)
        snap = (snap_colour, drop_db - .5, decay)
        for shape, db, life in [body, snap]:
            swell = np.exp(-abs(t) / np.where(t < 0, life * 0.24, life)) + spatter
            add(out, s + t[0], peaked(colour(rng.standard_normal(len(t)) * swell, shape), db))
        add(froth, s + t[0], froth_share * size * gain_of(drop_db) * froth_swell)
    fizz = bubbles(POURING, 1586, 5096, per_s=550, cycles=25, rise=0.0091, spread_db=6.0)
    out += froth * steadied(fizz, size=600)
    return echoed(0.2 * out + 0.35 * potted(out), wet_db=-10.0)


def pour():
    """The stream drives big bubbles under the surface, small ones at the top, and throws spray in clumps."""
    # colour of the gurgle: (frequency [Hz], density [dB per Hz])
    gurgle_colour = [(120, -37), (200, -3), (322, 5.5), (375, 1), (503, -10), (541, -13), (592, -17.5),
                     (700, -53), (910, -58), (1540, -120)]
    # colour of the slap: (frequency [Hz], density [dB per Hz])
    slap_colour = [(320, -7.5), (550, -6.5), (836, -17), (951, -1), (1040, -7.5), (1400, -5.5),
                   (1820, -22.5), (3080, -120)]
    slap_db, slap_depth_db = 0.5, -25  # the slap follows the splash, and fades as the stream lands deeper
    deep = depth()
    surge = evened(uniform_filter1d(rng.standard_normal(N), size=400))
    clumps = gain_of((3.0 - 0.88 * deep) * surge)  # a deep landing flows more evenly
    spray_clumps = gain_of((4.0 - 0.496 * deep) * surge)
    gush = (1 - deep) * evened(clicks(9000, 0.99))  # a shallow landing merges the impacts into a roar

    gurgle = bubbles(POURING, 208.0, 525, per_s=190, cycles=1.64, rise=0.022, spread_db=3.0)
    slap = bubbles(POURING, 645, 1320, per_s=280, cycles=5.1, rise=0.0096, spread_db=7.5) + 3 * gush

    splash = bubbles(POURING, 1291.0, 5573, per_s=2400, cycles=20.2, rise=0.0063, spread_db=2.0)
    splash += 0.31 * evened(clicks(6000, 1.2)) + 1.7 * gush
    shallow_splash = evened(colour(splash, SPLASH_COLOUR))
    deep_splash = evened(colour(potted(splash), DEEP_SPLASH_COLOUR))
    splash = (1 - deep) * shallow_splash + deep * deep_splash

    spray = evened(clicks(per_s=4200, spread_db=4.5)) + 1.5 * gush
    spray += 0.67 * bubbles(POURING, 5500, 14040, per_s=400, cycles=40, rise=0.0014, spread_db=4.5)
    far_pot = np.interp(TIME, [2.4, 2.6], [0, 1])  # the dregs land farther off and sound duller
    spray = (1 - far_pot) * spray + far_pot * band(spray, 1900, 7600)

    gurgling, splashing, spraying = (level(POUR_CURVES, axis=k + 1) for k in range(3))
    parts = [(colour(gurgle, gurgle_colour), gurgling),
             (colour(slap * clumps, slap_colour), gain_of(slap_db + slap_depth_db * deep) * splashing),
             (splash * clumps, gain_of(-5.5) * splashing),
             (colour(potted(spray * spray_clumps), SPRAY_COLOUR), gain_of(0.5) * spraying)]
    out = np.zeros(N)
    for x, gain in parts:
        out += gain * steadied(off_the_wall(echoed(x, wet_db=-8.0), delay=0.00131, share=0.39))
    return out


def scene():
    """Everything heard from one point, as a single channel."""
    poured = drifting(pour() + splats() + patter()) + glugs() + simmer()
    handled = rubs() + knocks() + blows() + pings()
    around = whistles() + wind() + background()
    return (poured + handled + around)[None]


def record(dry):
    """Full-scale limit, then the band limit."""
    edge_hz = 16150
    low_pass = signal.firwin(511, edge_hz, window=("kaiser", 9), fs=SR)
    return signal.oaconvolve(np.clip(dry, -1, 1), low_pass[None], "same")


dry = scene()
out = record(dry)
waveform_to_disk(out)
```